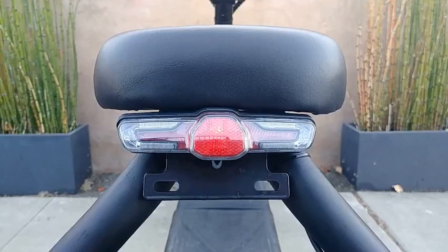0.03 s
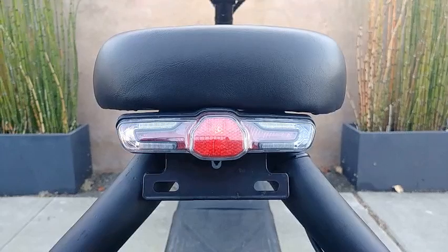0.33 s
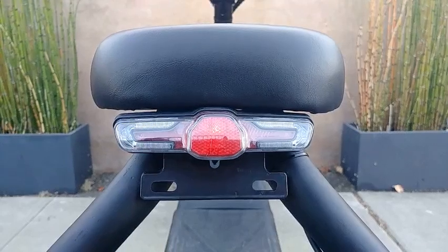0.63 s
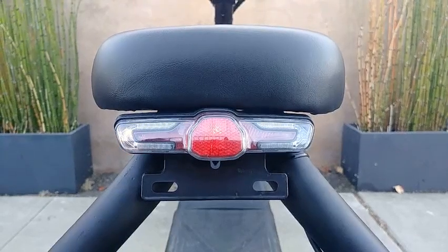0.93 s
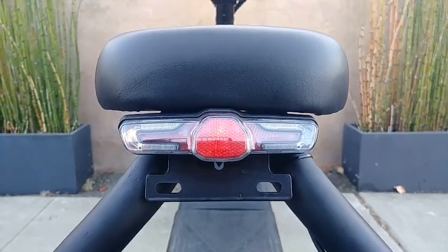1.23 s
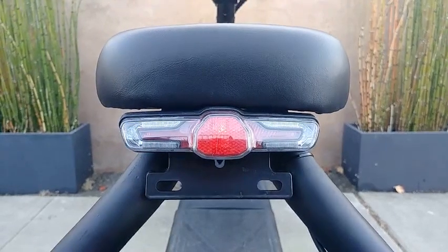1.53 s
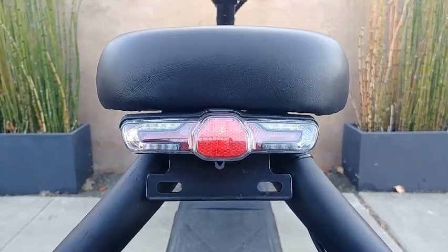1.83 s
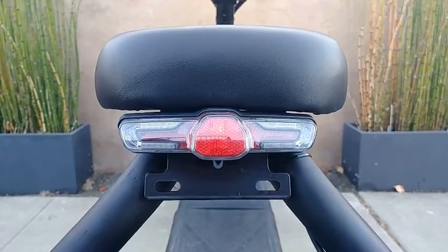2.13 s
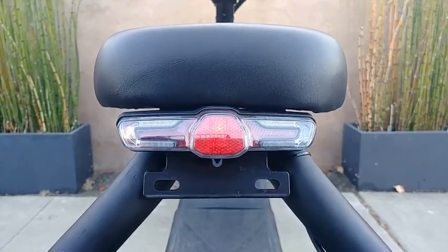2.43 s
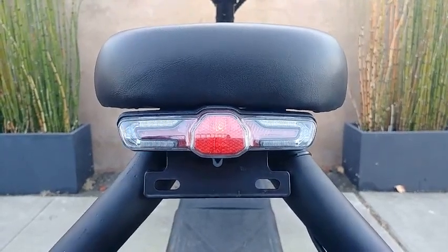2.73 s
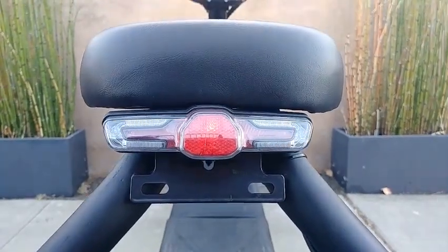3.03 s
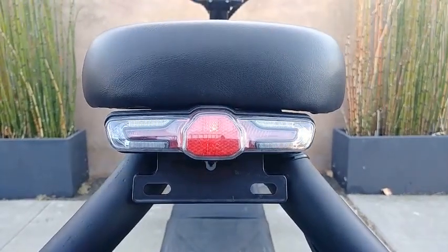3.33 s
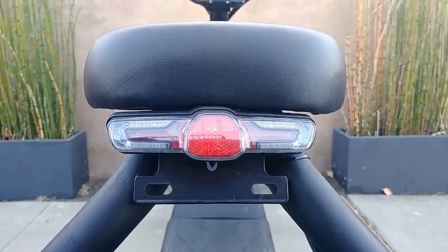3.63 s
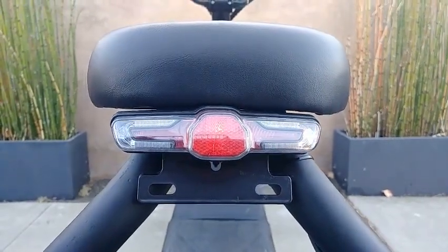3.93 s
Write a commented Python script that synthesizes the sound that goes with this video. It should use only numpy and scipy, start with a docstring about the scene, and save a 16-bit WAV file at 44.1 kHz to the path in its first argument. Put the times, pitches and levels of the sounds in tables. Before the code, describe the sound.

Distant traffic rumble and a low machine hum, with a small bird chirping twice.

```python
"""Small bird in a walled town yard

Far traffic rumbles behind a throbbing machine drone and a steady mains hum. In the yard a small bird
gives thin ticks and two falling calls that echo off the walls; the microphone is nudged a few times.
The sound comes in two stretches with a short silence between, each opening with a brief swell of hiss."""
import sys
import numpy as np
from scipy import signal
from scipy.io import wavfile

SR = 44100
rng = np.random.default_rng(int(sys.argv[2]) if len(sys.argv) > 2 else 0)


def master(y):
    """Save y as 16-bit WAV."""
    cut = np.clip(np.atleast_2d(y).T, -1, 1)
    pcm = np.round(cut * 32767)  # scale
    wavfile.write(sys.argv[1], SR, pcm.astype(np.int16))


N = 176400
TIME = np.arange(N) / SR


def from_db(db):
    """Decibels to gain."""
    return 10 ** (np.asarray(db) / 20)


def rms_one(x):
    """Scale to unit power."""
    return x / np.sqrt(np.mean(x ** 2) + 1e-20)


def curve(rows, t=TIME):
    """The columns of a table, joined by straight lines in time."""
    times, *columns = np.transpose(rows)
    return [np.interp(t, times, column) for column in columns]


def at_hz(rows, hz, column=1):
    """One column of a table, read on a log-frequency axis."""
    rows = np.array(rows)
    return np.interp(np.log(hz), np.log(rows[:, 0]), rows[:, column])


def pan(db):
    """Left and right gains with a mean of one; positive dB leans left."""
    gains = from_db(np.array([[db], [-db]]) / 2)
    return gains / gains.mean()


def drift(rate_hz):
    """A random wander of unit power, mostly slower than the given rate."""
    step = 20
    pole = np.exp(-2 * np.pi * rate_hz * step / SR)
    slow = signal.lfilter([1], [1, -2 * pole, pole ** 2], rng.standard_normal(N // step + 3002))[3000:]
    return np.interp(np.arange(N) / step, np.arange(len(slow)), rms_one(slow))


def bandpass(x, low_hz, high_hz):
    """Keep the band between two frequencies."""
    return signal.sosfilt(signal.butter(2, [low_hz, high_hz], "band", fs=SR, output="sos"), x)


def noise_bands():
    """Third-octave bands of two unrelated noises: (centre [Hz], one noise, the other)."""
    edges = 22 * 2 ** (np.arange(30) / 3)
    white = rng.standard_normal((2, 2, N))
    for k, (low, high) in enumerate(zip(edges, edges[1:])):
        yield np.sqrt(low * high), *bandpass(white[k % 2], low, high)


def spread(mid, side, likeness):
    """A stereo pair with the given left-right correlation."""
    likeness = np.clip(likeness, -.99, .99)
    return np.sqrt(1 + likeness) * mid + np.sqrt(1 - likeness) * side * [[1], [-1]]


# The far streets as heard in each stretch: (frequency [Hz], relative noise density [dB])
STREET_FIRST = [(25, -33), (42, -19), (62, -3), (90, 3), (125, -3), (170, -3), (205, -10.5), (260, -9.5),
                (330, -12), (480, -17.5), (900, -22), (1300, -28.5), (2500, -35), (5000, -40),
                (8000, -44.5), (10500, -49), (15500, -44.5)]
STREET_SECOND = [(25, -25), (42, -30), (62, -2.5), (90, 2.5), (150, -3), (200, -13), (240, -10), (290, -16),
                 (450, -22.5), (750, -19), (1200, -26.5), (1950, -27.5), (2600, -35), (5700, -39),
                 (7000, -43), (10500, -49), (15500, -44)]
# Left over right at the microphone: (frequency [Hz], first stretch [dB], second stretch [dB])
STREET_PAN = [(60.3, 2, 3), (126, 8.5, 0), (240, 14.5, 2.5), (480, 11, 3), (960, 12, 4), (1890, 4.5, -3),
              (3800, 2.5, 1.5), (15000, 2, 1)]
# Left-right correlation: (frequency [Hz], first stretch [-1..1], second stretch [-1..1])
STREET_LIKENESS = [(60, 0.51, 1), (130, 0.51, 1), (240, 0.57, 1), (480, 0.38, 0.63), (950, 0.06, -0.13),
                   (1890, 0, -0.29), (4000, 0, -0.043)]


def street(flicker_db=0.74):
    """Steady far noise of the town, flickering below 2 kHz: one stereo bed for each stretch."""
    beds = [0, 0]
    for hz, mid, side in noise_bands():
        flicker = from_db(flicker_db * drift(9.9) * (hz < 2000))
        for k, colour in enumerate([STREET_FIRST, STREET_SECOND]):
            band = spread(mid, side, at_hz(STREET_LIKENESS, hz, column=k + 1))
            lean = pan(at_hz(STREET_PAN, hz, column=k + 1))
            beds[k] += flicker * from_db(at_hz(colour, hz)) * lean * band
    return [rms_one(bed) for bed in beds]


# Far traffic booming between the walls: (centre [Hz], width [Hz], relative level [dB])
TRAFFIC_MODES = [(94.8, 14, 0), (147.8, 15.7, -2), (239.4, 32, 0), (335.8, 39, -2.5), (405, 25, -9.5),
                 (481.3, 20, -11.5), (552.4, 34, -13.5)]
# Its rise and fall, off to the left: (time [s], level [dB])
TRAFFIC_LEVEL = [(0, -54), (.5, -62), (1.05, -61), (1.3, -63.5), (1.6, -57.5), (2.0, -58.5), (2.4, -54.5),
                 (2.8, -53.5), (3.0, -63), (3.25, -58), (3.5, -67), (4, -64.5)]


def traffic(likeness=0.62):
    """Engine rumble in a few broad resonances, growing as a far vehicle nears."""
    rumble = 0
    for hz, width, db in TRAFFIC_MODES:
        mode = bandpass(rng.standard_normal((2, N)), hz - width / 2, hz + width / 2)
        rumble += from_db(db) * rms_one(mode)
    return from_db(curve(TRAFFIC_LEVEL)[0]) * pan(db=10) * rms_one(spread(*rumble, likeness))


# A distant boom that comes and goes, left of centre: (time [s], level [dB])
BOOM_LEVEL = [(0, -50.5), (.25, -52.5), (.6, -59), (1.05, -56.5), (1.3, -66), (2.3, -62), (2.75, -58),
              (3.0, -66), (3.3, -58.5), (3.6, -74), (4, -66)]


def boom(hz=169, width_hz=14.5):
    """A narrow low resonance in the town's rumble."""
    resonance = bandpass(rng.standard_normal(N + SR), hz - width_hz / 2, hz + width_hz / 2)[SR:]
    return from_db(curve(BOOM_LEVEL)[0]) * pan(db=7.5) * rms_one(resonance)


# The throb of a machine, left of centre: (time [s], level [dB])
DRONE_LEVEL = [(.07, -56), (.16, -40), (.38, -54.5), (.5, -46.5), (.68, -58.5), (.78, -49), (1.1, -52),
               (1.45, -56.5), (1.56, -50), (2.07, -59.5), (2.22, -50), (2.42, -66), (2.55, -47),
               (2.7, -57.5), (3.14, -54), (3.31, -41), (3.43, -55), (3.57, -45), (3.71, -69), (3.87, -42.5),
               (4, -58)]


def machines(drone_hz, hum_db, wander_hz=0.71, hum_hz=120.16, waver_db=0.5):
    """A low drone that throbs, over a steady mains hum."""
    phase = 2 * np.pi * np.cumsum(drone_hz + wander_hz * drift(3.02)) / SR
    drone = from_db(curve(DRONE_LEVEL)[0]) * np.sin(phase)
    hum = from_db(hum_db + waver_db * drift(3.7)) * np.sin(2 * np.pi * hum_hz * TIME)
    return np.sqrt(2) * (drone * pan(db=5.5) + hum * pan(db=8))


# Hiss opening each stretch: (start [s], end of hold [s], base level [dB], pan [dB], boost [dB])
SWELLS = [(-.04, 0.163, -57, 5.5, 3), (2.94, 3.242, -58, 1.5, 4)]
# Its colour: (frequency [Hz], relative noise density [dB])
SWELL_COLOUR = [(150, 7), (400, -2.5), (850, -5), (1300, -10.5), (2000, -13.5), (2700, -16), (5500, -21),
                (7500, -25.5), (10500, -32.5), (15500, -25.5)]
# The boost lifts the level and also favours the midrange: (frequency [Hz], share of boost [0..1])
SWELL_MIDRANGE = [(300, 0), (700, 0.88), (2000, 1), (2800, 0.086)]


def hiss_swells(rise_s=0.096, fall_s=0.16):
    """Broad hiss that rises, holds and sinks away."""
    bands = [(hz, np.array(pair)) for hz, *pair in noise_bands() if hz > 100]
    out = 0
    for start, end, db, pan_db, boost_db in SWELLS:
        hiss = 0
        for hz, band in bands:
            hiss += from_db(at_hz(SWELL_COLOUR, hz) + boost_db * at_hz(SWELL_MIDRANGE, hz)) * band
        rise = np.clip((TIME - start) / rise_s, 0, 1)
        fall = np.clip(1 - (TIME - end) / fall_s, 0, 1)
        out += from_db(db + boost_db) * rise * fall * pan(pan_db) * rms_one(hiss)
    return out


# Nudges right on the microphone: (time [s], level [dB])
NUDGES = [(.691, -44), (2.570, -41.5), (2.612, -46)]
# The ringing of its body: (frequency [Hz], relative level [dB], time to fall 60 dB [s])
MICROPHONE_MODES = [(66, -12, 0.15), (102, 1, 0.16), (160, 2, 0.042), (270, 2, 0.019)]


def nudges(left_db=-25):
    """Soft dull bumps on the microphone's body, mostly on the right."""
    out = 0
    for start, db in NUDGES:
        t = np.maximum(TIME - start, 0)
        for hz, mode_db, t60 in MICROPHONE_MODES:
            out += from_db(db + mode_db - 60 * t / t60) * np.sin(2 * np.pi * hz * t)
    return out * from_db([[left_db], [0]])


# Echoes off the walls, nearest first: (delay [s], relative left [dB], relative right [dB])
WALL_ECHOES = [(.0058, -11, -15), (.0122, -10, -8), (.031, -15, -9), (.064, -18.5, -17), (.105, -19.5, -17),
               (.27, -26.5, -19), (.36, -26, -25)]


def yard(x, echo_db, tail_db=-12.5, tail_t60_s=1.4, build_s=0.052):
    """The direct sound, then a few wall echoes and a thin scattered tail, both scaled by echo_db."""
    t = TIME[:SR]
    tail = rng.standard_normal((2, SR)) * from_db(-60 * t / tail_t60_s) * np.clip(t / build_s, 0, 1)
    response = from_db(tail_db) * rms_one(tail) / np.sqrt(SR)
    for delay, left_db, right_db in WALL_ECHOES:
        response[:, int(delay * SR)] += from_db([left_db, right_db])
    return x + from_db(echo_db) * signal.fftconvolve(x[None], response, axes=1)[:, :N]


# Thin ticks, well left of the microphone: (start [s], level [dB], length [s], echo gain [dB])
TICKS = [(.594, -64, 0.014, -7), (0.669, -65.5, .014, -9), (2.459, -72, .03, 1)]


def bird_ticks(top_hz=9890, end_hz=6340, rough_hz=1000):
    """Very short, rough ticks: a narrow band of noise sweeps downward."""
    lowpass = signal.butter(2, rough_hz, fs=SR, output="sos")
    out = 0
    for start, db, length, echo_db in TICKS:
        along = np.clip((TIME - start) / length, 0, 1)
        phase = 2 * np.pi * np.cumsum(top_hz + (end_hz - top_hz) * along) / SR
        rough = rms_one(signal.sosfilt(lowpass, rng.standard_normal((2, N))))
        sweep = rough[0] * np.cos(phase) + rough[1] * np.sin(phase)
        envelope = np.sin(np.pi * along ** 1.58) ** 2  # peaks past the middle
        out += yard(from_db(db) * envelope * sweep, echo_db)
    return pan(db=21) * out


# One falling call: (time into call [s], pitch [Hz], relative fundamental [dB], relative octave [dB])
CALL_SHAPE = [(0, 2640, -29.5, -59), (.016, 2551, -8.5, -50), (.028, 2470, -16.5, -50),
              (.035, 2400, 2.5, -35), (.053, 2290, -5, -41), (.068, 2184, 4.5, -26.5),
              (.085, 2043, -12, -25.5), (.112, 1792, -16, -13.5), (.132, 1655, -33, -1),
              (.168, 1600, -44, -8), (.202, 1541, -54, -8.5), (.236, 1300, -50, -13),
              (.265, 1530, -50, -22)]
# Two calls in the yard, the first well to the left, the second louder and right of centre:
# (start [s], level [dB], pan [dB], echo gain [dB], octave gain [dB])
CALLS = [(2.343, -53, 21, 1, 1.5), (3.899, -44.5, -6.5, -2, -4)]
FLUTTER_FROM_S, FLUTTER_ONSET_S, FLUTTER_HZ, FLUTTER_DEPTH = 0.091, 0.02, 169.4, 0.66
WHISTLE_JITTER, FLUTTER_JITTER, FLUTTER_SWING = 0.00606, 0.026, 0.055  # shares of the pitch


def bird_calls(edge_s=.005):
    """A falling whistle whose octave takes over and turns rough, fluttering like overlapping echoes."""
    length = CALL_SHAPE[-1][0]
    out = 0
    for start, db, pan_db, echo_db, bright_db in CALLS:
        t = TIME - start
        hz, fundamental_db, octave_db = curve(CALL_SHAPE, t)
        # A fast flutter of pitch and loudness imitates wall echoes beating against each other.
        roughness = np.clip((t - FLUTTER_FROM_S) / FLUTTER_ONSET_S, 0, 1)
        beat = 2 * np.pi * FLUTTER_HZ * t + drift(27)
        flutter = 1 + FLUTTER_DEPTH * roughness * np.sin(beat)
        waver = WHISTLE_JITTER * drift(147)
        bend = roughness * (FLUTTER_JITTER * drift(380) + FLUTTER_SWING * np.cos(beat))
        phase = 2 * np.pi * np.cumsum(hz * (1 + waver + bend)) / SR
        fundamental = from_db(fundamental_db) * np.sin(phase)
        octave = from_db(octave_db + bright_db) * np.sin(2 * phase)
        envelope = np.clip(np.minimum(t, length - t) / edge_s, 0, 1)
        call = envelope * flutter * (fundamental + octave)
        out += np.sqrt(2) * from_db(db) * pan(pan_db) * yard(call, echo_db)
    return out


# Stretches of sound: (start [s], end [s], street level [dB], drone pitch [Hz], hum level [dB])
STRETCHES = [(0.036, 2.86, -51.5, 74.07, -55.5), (2.941, 4.1, -53, 78.1, -57.5)]


def scene(silence_db=-104, fade_s=0.023):
    """The yard at the microphone, in two stretches that open at once and close with a short fade."""
    shared = traffic() + boom() + hiss_swells() + bird_calls() + bird_ticks() + nudges()
    out = from_db(silence_db) * rng.standard_normal((2, N))
    for (start, end, street_db, drone_hz, hum_db), town in zip(STRETCHES, street()):
        gate = (TIME >= start) * np.clip((end - TIME) / fade_s, 0, 1)
        out += gate * (shared + from_db(street_db) * town + machines(drone_hz, hum_db))
    return out


def record(dry, cutoff_hz=15750):
    """The highest treble is cut steeply."""
    return signal.sosfilt(signal.ellip(12, .1, 70, cutoff_hz, fs=SR, output="sos"), dry)


dry = scene()
out = record(dry)
master(out)
```